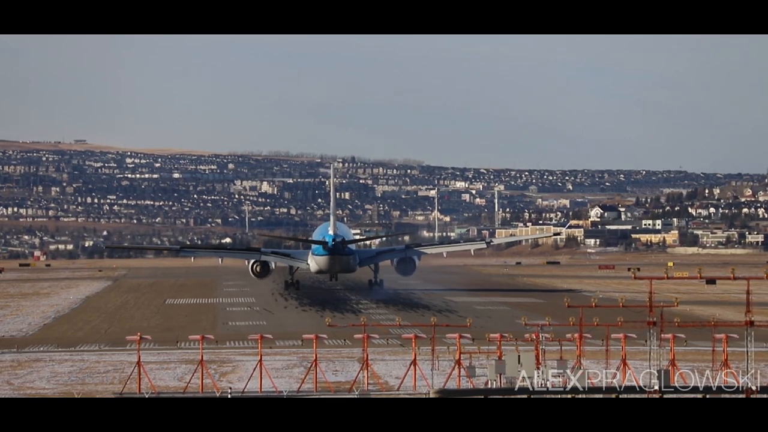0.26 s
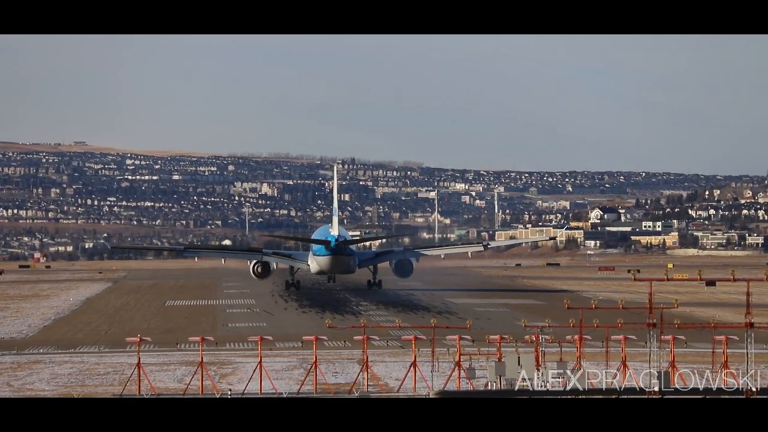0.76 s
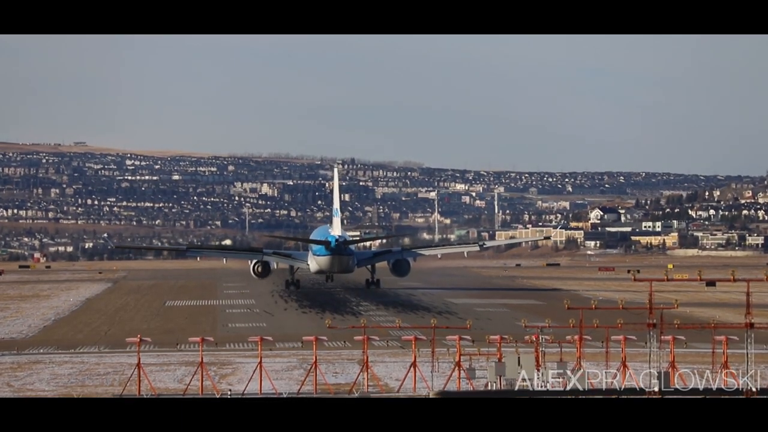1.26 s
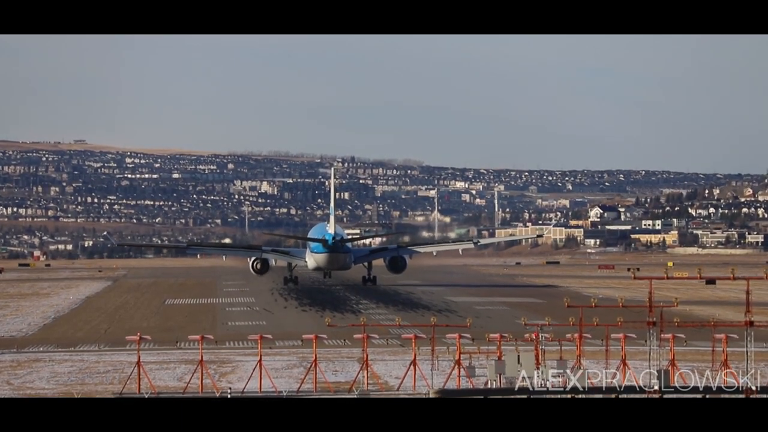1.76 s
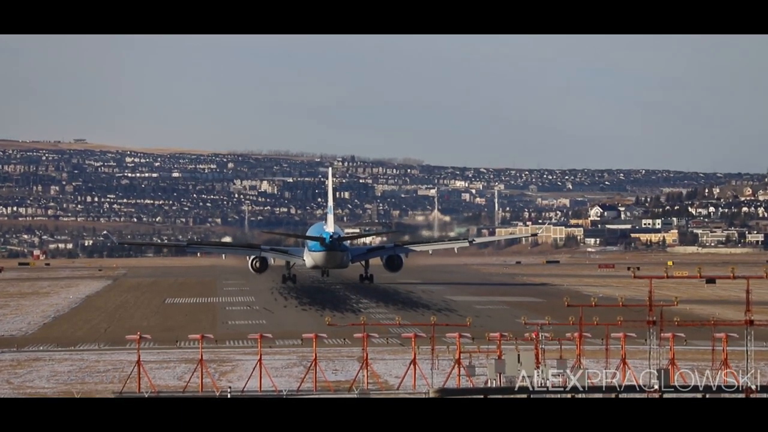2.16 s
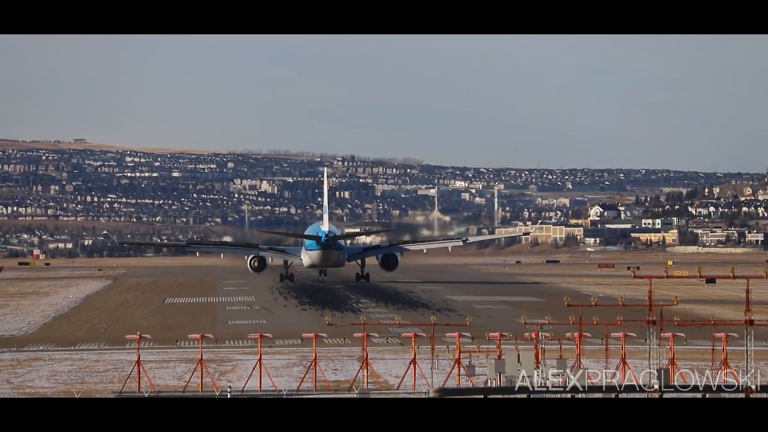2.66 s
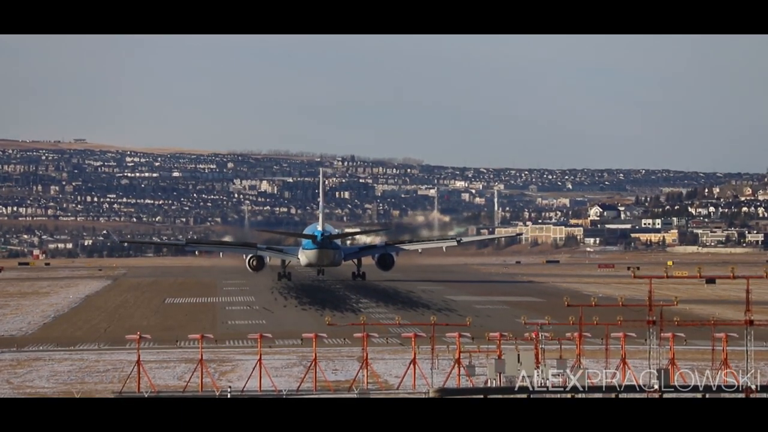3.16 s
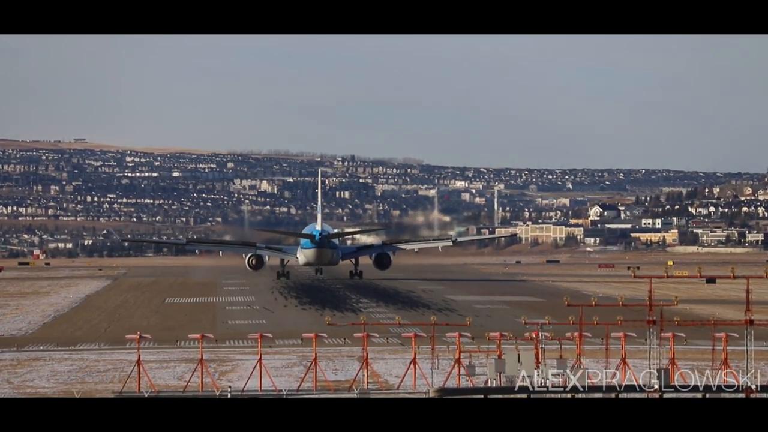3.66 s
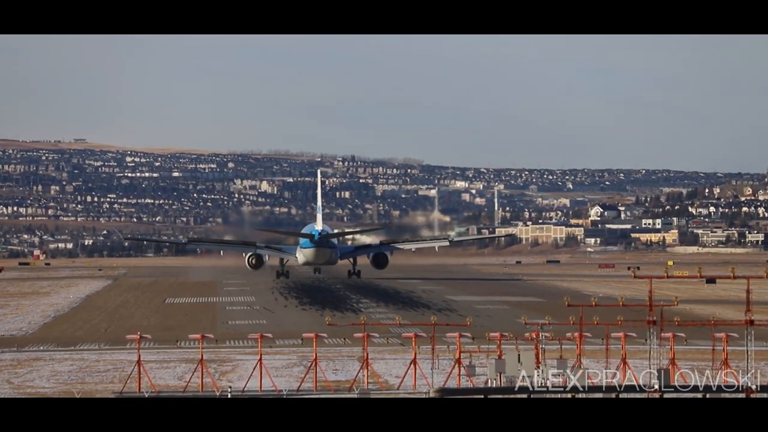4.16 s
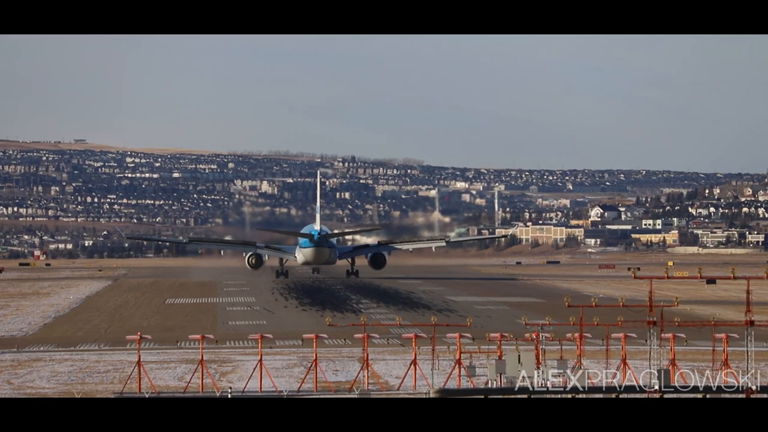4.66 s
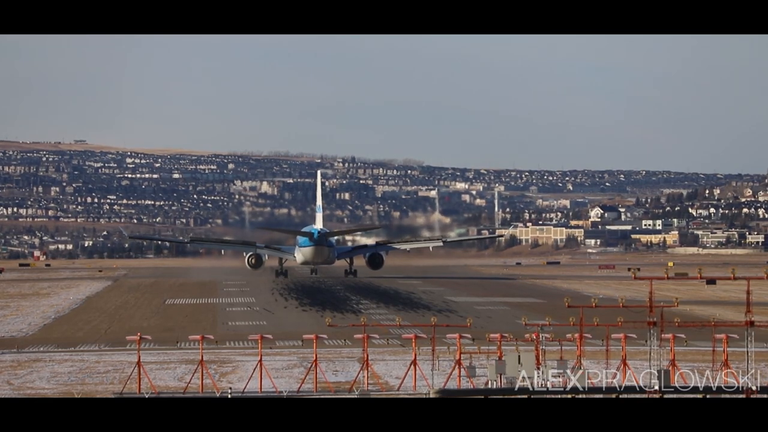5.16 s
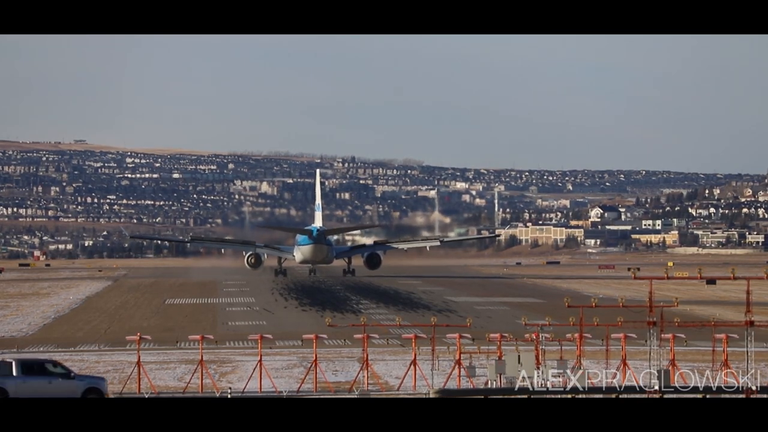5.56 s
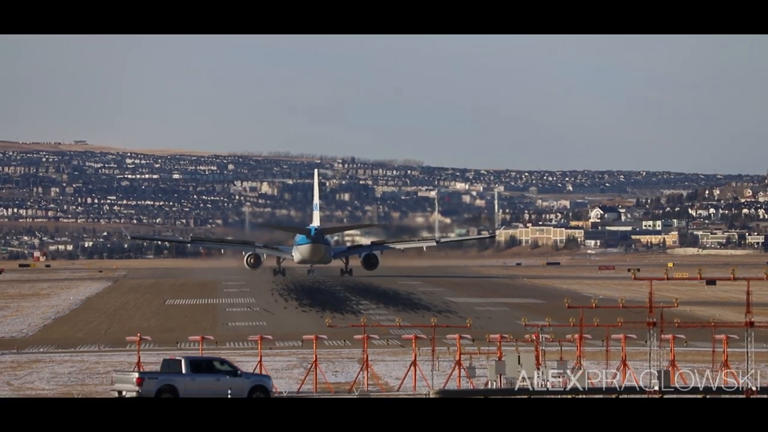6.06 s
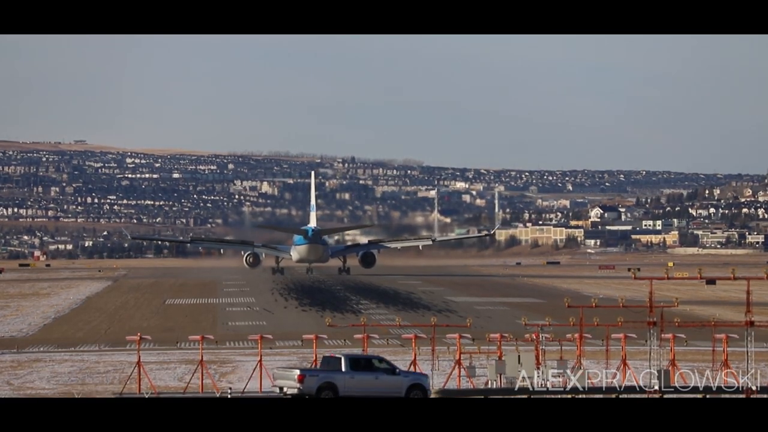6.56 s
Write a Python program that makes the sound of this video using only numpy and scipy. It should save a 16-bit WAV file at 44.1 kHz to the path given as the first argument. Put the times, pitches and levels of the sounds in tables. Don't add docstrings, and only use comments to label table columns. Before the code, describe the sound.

Distant twin-engine airliner roars dully in reverse thrust on a runway, its hollow tone drifting, while heavy wind gusts thump and rumble the microphone.

```python
import sys
import numpy as np
from scipy import signal
from scipy.fft import rfft, irfft, next_fast_len
from scipy.io import wavfile
from scipy.ndimage import uniform_filter1d, map_coordinates

SR = 44100
rng = np.random.default_rng(int(sys.argv[2]) if len(sys.argv) > 2 else 0)


def gain_from_decibels(decibels):
    exponent = np.asarray(decibels, float) / 20
    return 10 ** exponent


def persist_wave(psi):
    counts = np.round(np.clip(psi, -1, 1) * 32767).astype(np.int16)
    wavfile.write(sys.argv[1], SR, np.atleast_2d(counts).T)


N = 300179
TIME = np.arange(N) / SR

# (frequency [Hz], density [dB per Hz])
HISS_COLOUR = [(300, -10.5), (3000, -5.5), (6000, 0), (10000, -1), (13000, -1.5), (15500, -4),
               (17000, -12.5)]

# (time [s], peak level [dB], brightness [0-1])
BODY_TICKS = [(.242, -44, .5), (.252, -39, .5), (6.056, -53, .5), (6.073, -42, 0.4), (6.09, -54, .5),
              (6.502, -37, 0.5), (6.507, -34.5, 0.3), (6.516, -34, 0.6), (6.536, -32, 0.1),
              (6.544, -40.5, 0.9), (6.552, -50, 0.3), (6.603, -34.5, 0), (6.611, -47, 0.7)]

# (frequency [Hz], density [dB per Hz])
BUFFET_COLOUR = [(7.1, -35.5), (12, -9), (32, 4.5), (54, 0), (84, -3.5), (166, -15.5), (200, -13),
                 (260, -24), (440, -120)]
# (time [s], level [dB])
BREEZE_LEVEL = [(0, 45.5), (.6, 47), (1.2, 42.5), (1.8, 43), (2.4, 48), (3.8, 44.5), (4.6, 36), (5.2, 27),
                (5.7, 28.5), (6.2, 46), (6.8, 42)]
# (time [s], level over the hiss [dB], length [s])
GUST_SWELLS = [(0.08, 59.5, 0.023), (0.19, 49, 0.038), (0.26, 54.5, 0.013), (0.35, 50.5, 0.091),
               (0.52, 59.5, 0.012), (0.81, 55.5, 0.027), (0.83, 50, 0.14), (1.05, 53.5, 0.033),
               (1.29, 46.5, 0.024), (1.4, 53.5, 0.024), (1.51, 52.5, 0.016), (1.65, 58, 0.022),
               (1.93, 54.5, 0.056), (2.06, 58, 0.016), (2.2, 47.5, 0.11), (2.48, 53.0, 0.084),
               (2.76, 50.5, 0.042), (3.15, 46, 0.041), (3.37, 47, 0.041), (3.67, 45.5, 0.023),
               (3.94, 44.5, 0.048), (4.34, 43.5, 0.045), (4.58, 44.5, 0.03), (4.99, 41.5, 0.062),
               (5.59, 38, 0.15), (5.87, 46, 0.02), (5.97, 49, 0.019), (6.13, 43, 0.015), (6.44, 44, 0.013),
               (6.66, 41, 0.04)]

# (time [s], frequency [Hz])
FAN_PITCH = [
    (0, 1621),
    (.8, 1614),
    (1.3, 1615),
    (1.7, 1620),
    (2.2, 1632),
    (3, 1643),
    (3.9, 1652),
    (5.2, 1658),
    (5.8, 1658),
    (6.8, 1653),
]
# (time [s], level [dB], length [s])
NEAR_GLINTS = [(.37, -49, 0.079), (.7, -50.5, 0.06), (1.3, -56, .15), (1.62, -51.5, 0.052),
               (2.7, -53, 0.094), (2.95, -45, 0.099), (3.15, -54, .08), (4.1, -56, .15),
               (4.75, -58.5, 0.11), (5.5, -59, .3), (6.7, -58, 0.15)]
# (time [s], level [dB], length [s])
OTHER_GLINTS = [
    (2.95, -54, 0.18),
    (3.75, -57, 0.18),
    (5.2, -64, 0.69),
]

# (frequency [Hz], density [dB per Hz])
ROAR_COLOUR = [(25, -39), (50, -13.5), (90, -10), (125, -6), (160, -6.5), (200, -3), (270, -4.5),
               (340, -3.5), (430, -3.5), (520, -6.5), (630, -11), (800, -19.5), (1000, -36), (2200, -120)]
TEAR_COLOUR = [(470, -8), (800, -6.5), (1100, -8.5), (1260, -11.5), (1660, -18.5), (1920, -24.5),
               (2400, -38.5), (3120, -60.5), (5280, -120)]
FIZZ_COLOUR = [(1500, -40), (2100, 1.5), (2600, 0), (3500, -5.5), (5000, -10.5), (8000, -24.5),
               (12000, -44.5)]
# (time [s], level [dB])
AIR_CARRY = [(0, -2), (.4, 1.5), (.75, 3), (1.2, 1.5), (1.6, 1), (2.0, 0.5), (2.35, 1.5), (3, 1),
             (3.3, 1.5), (4.0, 0.5), (4.75, 0), (4.9, -.5), (5.2, 0), (5.45, 1), (5.7, -0.5), (6.15, -0.5),
             (6.45, 1.5), (6.8, -2.5)]
# (time [s], centre frequency [Hz], boost [dB], length [s])
PATH_BLOOMS = [(0.455, 205, -4.5, 0.21), (1.345, 205, -3, .2), (2.701, 232, 9, 0.068),
               (3.298, 203, 5, 0.49), (3.309, 478, 5, 0.22), (3.898, 443, 6, .2), (4.116, 339, 1.5, .1),
               (4.298, 255, 8, 0.14), (4.652, 203.7, 3.5, .15), (4.45, 401, 2, .15), (4.62, 276.4, 3, .12),
               (5.001, 264.5, 5.5, .22), (5.303, 463, 3, 0.36), (5.449, 241, 7.5, 0.21),
               (5.9, 191.6, 9, 0.14), (6.8, 180, 9, 0.24)]
# (time [s], boost [dB], length [s])
DRONE_SWELLS = [
    (0.053, 10.5, .3),
    (0.503, 1, .15),
    (0.799, 7, 0.16),
    (1.121, 12, 0.15),
    (1.55, 7.5, 0.11),
    (1.952, 10, .2),
    (2.452, 7, 0.2),
    (2.895, 4, .08),
]
# (time [s], change [dB], length [s])
TOP_SURGES = [
    (.55, -0.5, 0.048),
    (1.2, -2, .08),
    (1.801, -4, .07),
    (1.998, -1, .1),
    (2.452, 3, 0.043),
    (3.743, 2.5, 0.048),
    (5.81, 0.5, 0.064),
    (6.086, 4, 0.063),
]


def unit(x):
    return x / np.sqrt(np.mean(x ** 2) + 1e-20)


def curve(rows):
    s, value = np.transpose(rows)
    return np.interp(TIME, s, value)


def wobble(rate):
    knots = rng.standard_normal(int(N * rate / SR) + 4)
    return map_coordinates(knots, [np.arange(N) * rate / SR])


def bump(hz, centre_hz, width):
    return np.exp(-.5 * (np.log((hz + 1) / centre_hz) / width) ** 2)


def bell(t, s, length_s):
    return np.exp(-.5 * ((t - s) / length_s) ** 2)


def swells(rows, floor_db):
    power = sum(gain_from_decibels(2 * db) * bell(TIME, s, length_s) for s, db, length_s in rows)
    return 10 * np.log10(gain_from_decibels(2 * floor_db) + power)


def rush(spectrum, patchy_db, patch_hz, patch_s, drift_db=lambda hz, t: 0):
    frames = dict(nperseg=2048, noverlap=1536)
    hz, t, z = signal.stft(rng.standard_normal(N), SR, **frames)
    field = uniform_filter1d(rng.standard_normal(z.shape), max(1, int(patch_hz / hz[1])), axis=0)
    field = uniform_filter1d(field, max(1, int(patch_s / t[1])), axis=1)
    gain_db = patchy_db * unit(field) + drift_db(hz[:, None], t)
    x = signal.istft(z * gain_from_decibels(gain_db), SR, **frames)[1]
    f, db = np.transpose(spectrum)
    m = next_fast_len(N + 8192)
    log_hz = np.log(np.fft.rfftfreq(m, 1 / SR) + 1)
    colour = gain_from_decibels(np.interp(log_hz, np.log(f + 1), db))
    return unit(irfft(rfft(x[:N], m) * colour, m)[:N])


def circuit_hiss():
    return gain_from_decibels(1.0) * rush(HISS_COLOUR, .3, patch_hz=2010, patch_s=.05)


def ticks():
    out, t = np.zeros(N + SR), np.arange(SR // 25) / SR
    dull = signal.butter(2, [800, 2500], "band", fs=SR, output="sos")
    ring = gain_from_decibels(-60 * t / 0.014)
    onset = 1 - np.exp(-t / 0.00095)
    low = 3.1 * ring * np.sin(2 * np.pi * 1650 * t)
    high = ring * np.sin(2 * np.pi * 3700 * t)
    for s, db, bright in BODY_TICKS:
        rattle = 1.3 * gain_from_decibels(-60 * t / 0.035) * signal.sosfilt(dull, rng.standard_normal(len(t)))
        knock = (1 - bright) * low + bright * high + rattle
        out[round(s * SR):][:len(t)] += gain_from_decibels(db) * onset * knock
    return out[:N]


def gust_db():
    return swells(GUST_SWELLS, curve(BREEZE_LEVEL))


def wind():
    eddies = rush(BUFFET_COLOUR, 0.64, patch_hz=40, patch_s=.12)
    swell = np.sqrt(np.abs(uniform_filter1d(eddies ** 2, int(.06 * SR)))) + .05
    return gain_from_decibels(gust_db() - 0.5) * unit(eddies / swell ** 0.77)


def camera_gain():
    delay_s, lag_s = 0.017, 0.013
    knee_db = 53.5 - 0.84 * TIME
    rest_db = -64 + 0.3342 * TIME
    keep = np.exp(-1 / (lag_s * SR))
    over = gain_from_decibels(2 * (np.interp(TIME - delay_s, TIME, gust_db()) - knee_db))
    held = signal.lfilter([1 - keep], [1, -keep], over, zi=[keep * over[0]])[0]
    return gain_from_decibels(rest_db - 0.89 * 10 * np.log10(1 + held))


def blade_tone(hz, db):
    waver_hz, fade_db = 1.3, 3.5
    phase = 2 * np.pi * np.cumsum(hz + waver_hz * wobble(13)) / SR
    return np.sqrt(2) * gain_from_decibels(db + 0.1 + fade_db * wobble(18)) * np.sin(phase)


def fans():
    hz = curve(FAN_PITCH)
    near = blade_tone(hz, swells(NEAR_GLINTS, -63.5))
    other = blade_tone(hz - 35, swells(OTHER_GLINTS, -70.5))
    return near + other


def hollow(hz, t):
    blooms = sum(db * bell(t, s, length_s) * bump(hz, centre_hz, 0.11)
                 for s, centre_hz, db, length_s in PATH_BLOOMS)
    drones = sum(db * bell(t, s, length_s) for s, db, length_s in DRONE_SWELLS)
    return blooms + drones * bump(hz, 337.4, 0.047)


def jets():
    carry_db = curve(AIR_CARRY)
    surge_db = sum(db * bell(TIME, s, length_s) for s, db, length_s in TOP_SURGES)
    roar_db = 49.5 + carry_db
    tear_db = 29 - 0.72 * TIME + 0.45 * carry_db + 0.38 * surge_db
    fizz_db = 7 - 0.2 * TIME + 0.34 * carry_db + surge_db
    flutter = wobble(16) + 0.99 * wobble(45)
    roar = rush(ROAR_COLOUR, 0.8, patch_hz=70, patch_s=0.34, drift_db=hollow)
    tear = rush(TEAR_COLOUR, 0.42, patch_hz=296.6, patch_s=.1)
    fizz = rush(FIZZ_COLOUR, 0.62, patch_hz=892, patch_s=.05)
    roar = roar * gain_from_decibels(roar_db - 2.61 + 0.73 * flutter)
    tear = tear * gain_from_decibels(tear_db + 2.5 + 0.31 * flutter)
    fizz = fizz * gain_from_decibels(fizz_db - 1.54 + 0.56 * flutter)
    return roar + tear + fizz


def scene():
    steady = (ticks() + fans()) / camera_gain()
    return (steady + wind() + jets())[None]


def limiter(x):
    span, knee = int(0.01 * SR), 0.34
    power = uniform_filter1d(x ** 2, span, axis=1)
    power = np.abs(uniform_filter1d(power, span, axis=1))
    return x * gain_from_decibels(0.47) / np.sqrt(np.sqrt(1 + (power / knee ** 2) ** 2))


def band_limit(x):
    return signal.sosfilt(signal.butter(12, 15750, fs=SR, output="sos"), x)


def record(dry):
    x = (dry + circuit_hiss()) * camera_gain()
    x = x * gain_from_decibels(0.45 * wobble(30))
    x = limiter(x)
    fade_in_s = 0.018
    x = x * np.clip(TIME / fade_in_s, 0, 1) ** .5
    return band_limit(x)


dry = scene()
out = record(dry)
persist_wave(out)
```